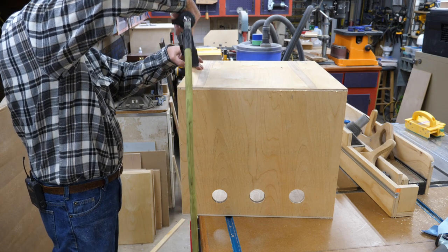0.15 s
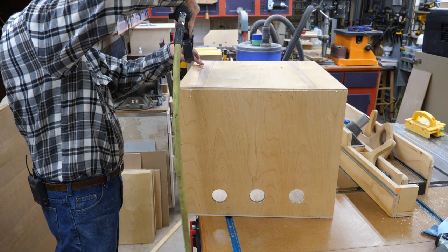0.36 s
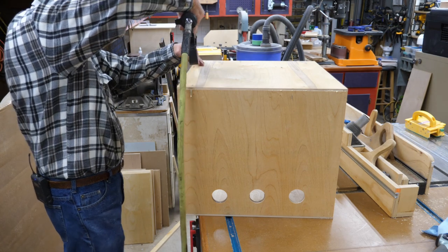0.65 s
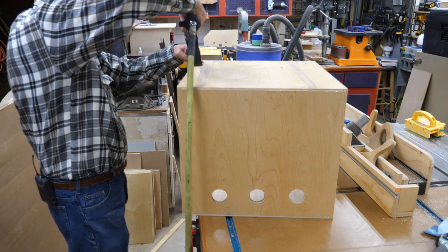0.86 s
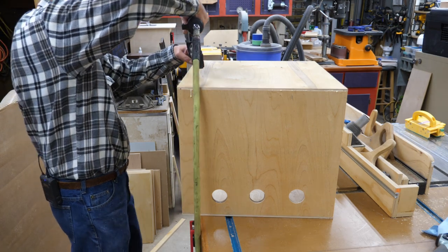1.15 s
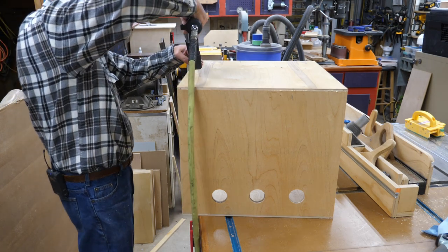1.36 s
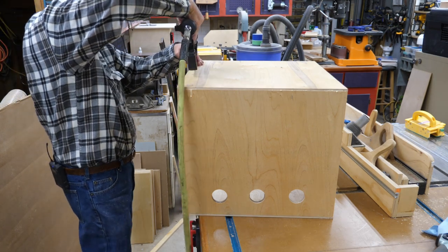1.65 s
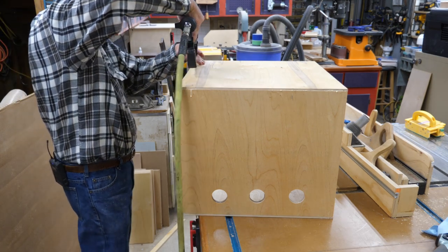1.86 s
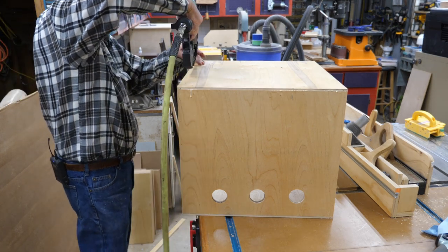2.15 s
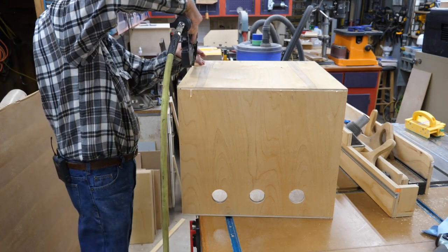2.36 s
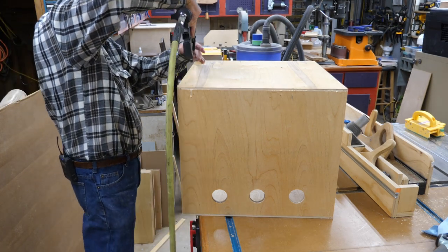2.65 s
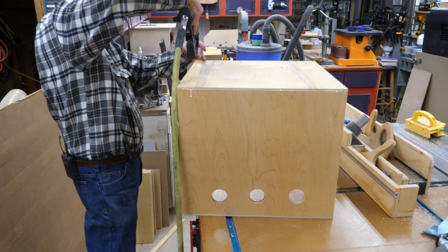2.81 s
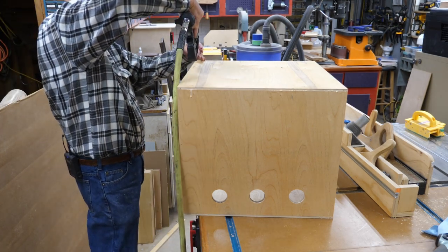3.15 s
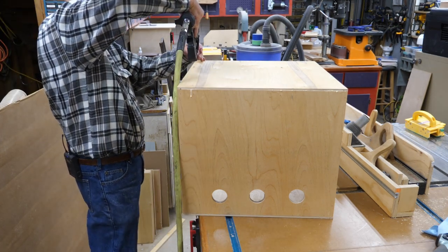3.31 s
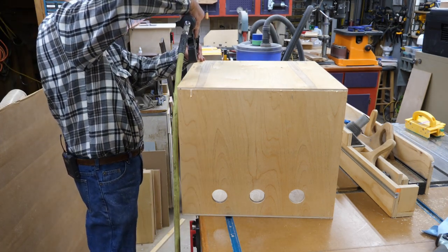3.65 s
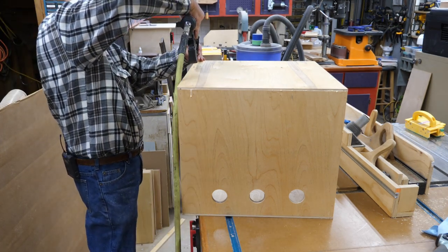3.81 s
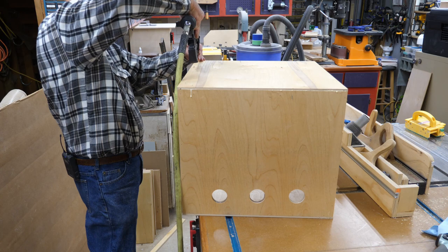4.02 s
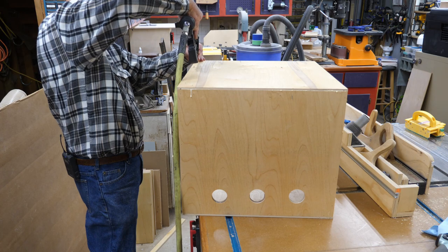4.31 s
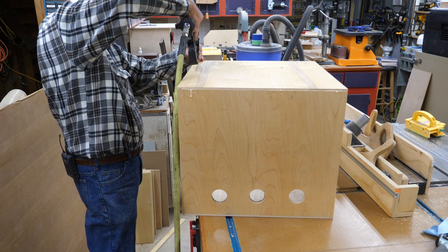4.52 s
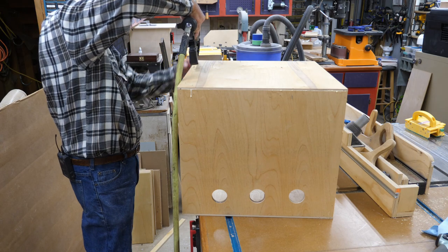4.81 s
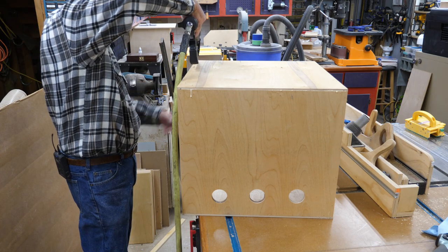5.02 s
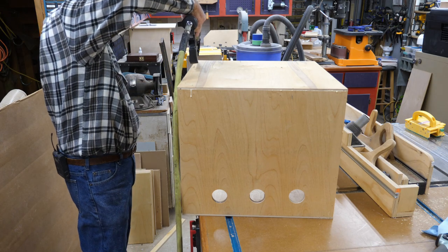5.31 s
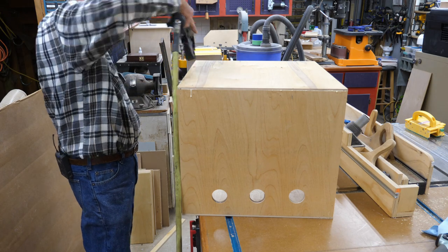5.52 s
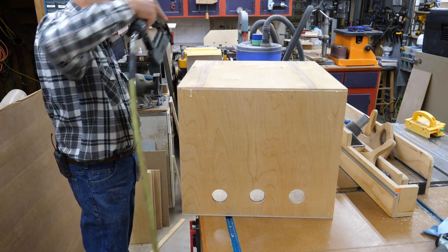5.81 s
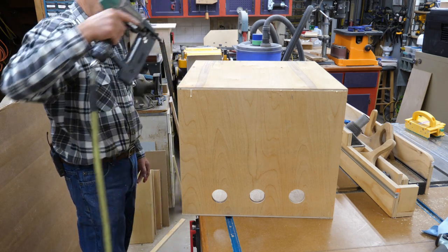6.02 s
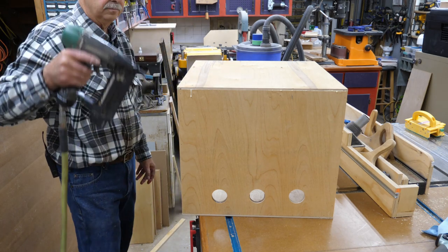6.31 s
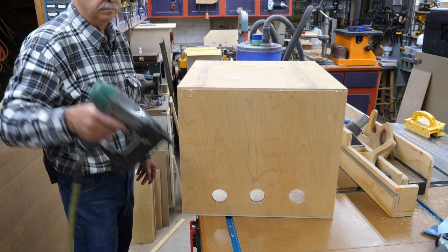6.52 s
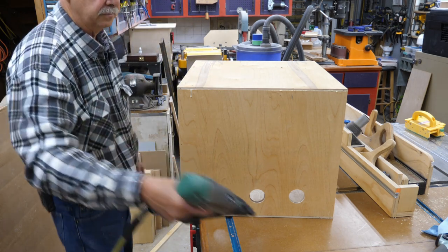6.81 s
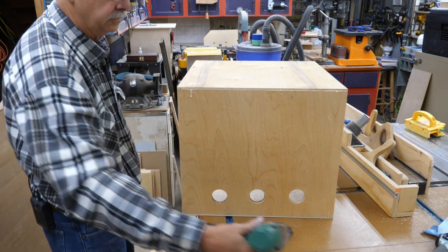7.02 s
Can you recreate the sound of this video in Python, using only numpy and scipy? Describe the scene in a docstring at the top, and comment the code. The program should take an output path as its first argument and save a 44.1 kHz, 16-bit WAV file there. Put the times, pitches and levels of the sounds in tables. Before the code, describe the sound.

In a woodshop, a pneumatic nailer slams three nails into a hollow plywood box, each blow followed by an air puff, with light taps between over fan hum.

```python
"""In a woodshop, a pneumatic nailer drives three nails into a plywood box; one microphone, no set distance.
The first cycle is already under way at the start. In each the trigger valve spits (noise and a ringing
sine), the driver slams (noise bursts), the box booms (decaying modes), air is dumped and the piston knocks.
Between shots the gun's nose slides and taps on the panel; after the last, hose and sleeve brush softly
(shaped noise). Behind: a fan's slowly rising rush with swelling tones, and faint noise bands fading late."""
import sys
import numpy as np
from scipy import signal
from scipy.fft import rfft, irfft, next_fast_len
from scipy.io import wavfile
from scipy.ndimage import uniform_filter1d, map_coordinates

SR = 44100
rng = np.random.default_rng(int(sys.argv[2]) if len(sys.argv) > 2 else 0)


def to_wav(sig):
    """Store sig (one row per channel, or 1-D mono) as 16-bit WAV at the path in sys.argv[1].

    Samples outside -1..1 are clipped; the rate is SR.
    """
    pcm = np.clip(np.atleast_2d(sig), -1, 1) * 32767
    pcm = np.round(pcm).astype(np.int16)
    wavfile.write(sys.argv[1], SR, pcm.T)  # frames by channels


N = 315747  # samples in the scene
AGE = np.arange(SR) / SR  # seconds since one sound began
CLOCK = np.arange(N) / SR  # seconds since the scene began


def amp(db):
    """Decibels to gain."""
    return 10 ** (np.asarray(db) / 20)


def unit(x):
    """Scale to rms 1."""
    return x / np.sqrt(np.mean(x ** 2) + 1e-20)


def along(points, hz):
    """Interpolate (Hz, value) points on a log frequency axis."""
    f, v = np.transpose(points)
    return np.interp(np.log(hz + 1), np.log(f + 1), v)


def wobble(rate):
    """A smooth random curve with rate knots a second."""
    knots = rng.standard_normal(int(N * rate / SR) + 4)
    return map_coordinates(knots, [CLOCK * rate])


def filtered(x, response):
    """Shape the spectrum of x by a gain that depends on frequency."""
    size = next_fast_len(len(x) + 8192)
    hz = np.fft.rfftfreq(size, 1 / SR)
    return irfft(rfft(x, size) * response(hz), size)[:len(x)]


def noise(spectrum, size=SR):
    """Coloured noise of rms 1."""
    white = rng.standard_normal(size)
    return unit(filtered(white, lambda hz: amp(along(spectrum, hz))))


def burst(spectrum, rise, hold, t60):
    """Noise that swells with time constant rise, holds, then falls 60 dB in t60 (all in seconds)."""
    swell = 1 - np.exp(-AGE / rise)
    decay = amp(-60 * np.maximum(AGE - hold, 0) / t60)
    return noise(spectrum) * swell * decay


def add(track, s, sound):
    """Mix a sound into the track at s seconds; whatever falls outside is cut off."""
    start = round(s * SR)
    part = sound[max(-start, 0):len(track) - start]
    track[max(start, 0):][:len(part)] += part


# The three nails at the box. Each row: blow in seconds, its level in dB, wait until the exhaust in
# seconds, exhaust level in dB, level in dB of the low thump within the exhaust.
NAILS = [(-.064, 2, 0.14, -.5, -33.5), (2.2459, 0, .137, 0.5, -27.5), (5.224, 1.24, 0.14, 0, -22.5)]


def nailer():
    """The firing cycle of each nail, from valve to blow to venting, and the last puff of the trigger."""
    out = np.zeros(N)
    for s, db, wait, exhaust_db, thump_db in NAILS:
        add(out, s - .052, trigger())
        add(out, s, amp(db) * drive())
        add(out, s + .105, head_valve_spit())
        add(out, s + wait - .008, head_valve_click())
        add(out, s + wait, amp(exhaust_db) * exhaust(thump_db))
    add(out, 5.44, trigger_release())
    return out


# Contacts of one blow. Each row: seconds after firing, level in dB, t60 in seconds.
BLOW_CONTACTS = [(0, -12, 0.077), (.003, -8, 0.03), (0.0101, -19, .04)]
# Colour of the crack. Each row: frequency in Hz, relative level in dB per Hz.
CRACK_COLOUR = [(88, -31), (150, -2.5), (439, 1), (716, -9), (1290, 6), (1630, -15), (2140, 0), (2400, -10),
                (2650, -1.5), (4410, -7), (5250, -6.5), (8730, -21), (13400, -26), (16000, -39)]


def drive():
    """The driver hits nail and bumper, the box booms, and the recoiling gun lands on it again."""
    crack = np.zeros(SR)
    for s, db, t60 in BLOW_CONTACTS:
        add(crack, s, amp(db) * burst(CRACK_COLOUR, rise=0.0013, hold=0.00072, t60=t60))
    boom = box(soft_hz=9000, swell_cycles=5.5)
    add(boom, -.006, amp(-23) * push(hz=143.4, width=0.00725))  # the top panel is shoved in
    add(boom, .028, amp(-16.0) * push(hz=408, width=0.00288))  # the gun lands again
    add(boom, .018, amp(-21.5) * push(hz=176.6, width=0.00793))  # and heaves under the landing
    return shop(crack, wet_db=-3.0) + boom


# Modes of the plywood box with the gun on it. Each row: frequency in Hz, relative level in dB,
# t60 in seconds.
BOX_MODES = [(138.8, -9.5, 0.17), (165.8, -16, 0.24), (218.7, -12, 0.23), (250, -27, 0.26),
             (365.3, -22, 0.18), (395.6, -20, 0.17), (483.7, -23, 0.35), (532.3, -17, 0.16),
             (585, -21.5, .18), (668, -26, 0.27), (726, -27, .1), (892, -25.5, .25), (958, -30.5, 0.27),
             (1070, -25, .26), (1190, -20, 0.13), (1348, -20.5, 0.18), (1595, -29.5, 0.16),
             (1697, -30, 0.33), (1860, -27, 0.19), (2055, -25.5, .27), (2536, -31, .16)]


def box(soft_hz, swell_cycles):
    """Box modes build over a few cycles and die away; a soft contact mostly stirs the low ones."""
    hz, db, t60 = np.transpose(BOX_MODES)[:, :, None]
    strength = amp(db + rng.normal(0, 1, hz.shape)) / (1 + (hz / soft_hz) ** 2)
    life = (1 - np.exp(-AGE * hz / swell_cycles)) * amp(-60 * AGE / t60)
    # each time the box is struck, its modes are detuned slightly at random
    pitch = hz * (1 + rng.normal(0, 0.0021, hz.shape))
    sign = (-1) ** np.arange(len(BOX_MODES))[:, None]  # neighbouring modes swing against each other
    return np.sum(sign * strength * life * np.sin(2 * np.pi * pitch * AGE), axis=0)


def push(hz, width):
    """One low shove of air: a sine under a bell of width seconds, centred two widths after its start."""
    t = AGE - 2 * width
    return np.sin(2 * np.pi * hz * t) * np.exp(-(t / width) ** 2)


# Colour of the dumped air. Each row: frequency in Hz, relative level in dB per Hz.
EXHAUST_COLOUR = [(160, -30.5), (280, -5), (367, -4), (1120, -5.5), (1280, -11), (1570, -4), (2100, -8),
                  (2800, -9), (3200, -10.5), (3860, -3.5), (5420, -6.5), (6410, -2.5), (8700, -12),
                  (14200, -9), (16000, -20.5)]
# Colour of the last air, also of the trigger's leak. Each row: frequency in Hz, relative level in dB per Hz.
BLEED_COLOUR = [(290, -34), (500, -28), (621, -25), (807, -37.5), (933, -22), (1020, -26.5), (1950, -6.5),
                (2570, -4.5), (6230, 1.5), (8450, -12), (13400, -19.5), (16000, -28)]
# Piston knocks on the way back. Each row: seconds after the exhaust opens, level in dB.
PISTON_KNOCKS = [(.001, -28), (.009, -19.5), (0.03, -29.5), (0.0396, -15.5)]
# Colour of a piston knock. Each row: frequency in Hz, relative level in dB per Hz.
PISTON_COLOUR = [(88, 0), (150, -10), (1900, -3), (2500, -17), (3040, -5.5), (5150, -15.5), (6020, -5.5),
                 (9080, -37.5), (13200, -40), (16000, -29)]


def exhaust(thump_db):
    """The cylinder dumps its air with a thump, the piston knocks back, and the last air bleeds off."""
    air = amp(-17.5) * burst(EXHAUST_COLOUR, rise=0.0035, hold=.018, t60=0.12)
    air += amp(-34.5) * burst(BLEED_COLOUR, rise=0.019, hold=0.086, t60=0.28)
    knocks = np.zeros(SR)
    for s, db in PISTON_KNOCKS:
        add(knocks, s, amp(db) * burst(PISTON_COLOUR, rise=0.00091, hold=0.0012, t60=0.035))
    body = np.zeros(SR)
    add(body, -.004, amp(thump_db) * push(hz=78.74, width=.0095))
    add(body, .006, amp(-11) * box(soft_hz=216, swell_cycles=0.97))
    add(body, .039, amp(-10) * box(soft_hz=119.7, swell_cycles=0.74))
    hard_stop_s = PISTON_KNOCKS[-1][0]
    add(body, hard_stop_s, amp(-24) * box(soft_hz=5000, swell_cycles=1.5))  # the piston's stop rings on
    return shop(air, wet_db=-15.5) + shop(knocks, wet_db=-12.5) + body


# Colour of the trigger valve's air. Each row: frequency in Hz, relative level in dB per Hz.
VALVE_COLOUR = [(180, -40), (300, -9.5), (701, -13), (885, -30), (1610, -10.5), (2440, -15), (3130, -12),
                (3640, -10.5), (4370, -5.5), (7080, -6.5), (8790, -18), (9880, -10), (13300, -12),
                (16000, -18.5)]


def trigger():
    """The trigger valve spits, and its steel parts ring briefly at an unsteady pitch."""
    spit = amp(-30) * burst(VALVE_COLOUR, rise=0.0014, hold=.008, t60=.12)
    ring = np.sin(2 * np.pi * 4300 * AGE + 2 * wobble(300)[:SR])
    steel = amp(-34.0) * ring * amp(-60 * AGE / .1)
    return shop(spit + steel, wet_db=-9.0)


# Colour of the head valve's spit. Each row: frequency in Hz, relative level in dB per Hz.
SPIT_COLOUR = [(1000, -31.5), (4000, -9.5), (9000, 3), (12000, -2.5), (16000, -2)]


def head_valve_spit():
    """A short spit of air from the head valve before it vents."""
    return shop(amp(-39.5) * burst(SPIT_COLOUR, rise=.001, hold=0.0057, t60=.012), wet_db=-11)


# Colour of small hard contacts. Each row: frequency in Hz, relative level in dB per Hz.
TICK_COLOUR = [(300, -8.5), (1500, -14.5), (3000, -3), (6000, 6), (8500, -9.5), (16000, -17.5)]


def head_valve_click():
    """The head valve clicks over: a tiny burst of hard-contact noise."""
    return amp(-34.0) * burst(TICK_COLOUR, rise=.0005, hold=0.0021, t60=0.0066)


def trigger_release():
    """The trigger is eased off: a thin leak of air stops short as its valve closes."""
    leak = amp(-45) * burst(BLEED_COLOUR, rise=.03, hold=.076, t60=.06)
    add(leak, .064, amp(-46) * burst(TICK_COLOUR, rise=.001, hold=.012, t60=.01))
    return leak


def click():
    """A small hard contact: a very short noise burst."""
    return burst(TICK_COLOUR, rise=.0002, hold=0.0008, t60=0.017)


# Colour of a wooden contact. Each row: frequency in Hz, relative level in dB per Hz.
KNOCK_COLOUR = [(100, -5.5), (300, -4), (520, 10.5), (1000, -4), (1700, -1.5), (3000, -8.5), (6000, -26),
                (16000, -87)]


def knock():
    """A short wooden contact: a noise burst weighted to the low mids."""
    return burst(KNOCK_COLOUR, rise=0.00053, hold=0.0017, t60=0.047)


def stroke(start, rise, length, db, t60):
    """Gain of a rubbing stroke: friction noise grows with hand speed, holds, and dies as the hand stops."""
    speed = np.clip((CLOCK - start) / rise, 0, 1)
    return speed * amp(db - 60 * np.maximum(CLOCK - start - length, 0) / t60)


# The nose slides over the plywood. Each row: start in seconds, speeding-up in seconds,
# length in seconds, level in dB.
NOSE_SLIDES = [(0.535, .2, 0.28, -50), (1.227, .004, 0.046, -44.5)]
# Colour of the sliding nose. Each row: frequency in Hz, relative level in dB per Hz.
SCRAPE_COLOUR = [(400, -15), (1200, -20), (1700, -5.5), (2350, -2.5), (3000, -9), (3800, -14.5),
                 (5000, -16.5), (7200, -24), (10500, -36), (15000, -39)]


def slides():
    """The nose rubs on plywood: scraping noise with a rough, random level."""
    gain = sum(stroke(*row, t60=0.21) for row in NOSE_SLIDES)
    return gain * noise(SCRAPE_COLOUR, size=N) * amp(wobble(120))


# Hose and sleeve brush as the gun is lifted and put down. Each row: start in seconds,
# speeding-up in seconds, length in seconds, level in dB.
HOSE_BRUSHES = [(6.0, 0.087, 0.12, -64.5), (6.74, 0.15, .16, -63), (7.0, .14, .16, -58)]
# Colour of the brushing. Each row: frequency in Hz, relative level in dB per Hz.
CLOTH_COLOUR = [(300, -6), (2000, 8), (5000, -1), (8500, -7), (11000, -20), (16000, -28)]


def brushes():
    """Soft rubbing of hose and sleeve after the last nail: smooth noise following each stroke."""
    gain = sum(stroke(*row, t60=0.4) for row in HOSE_BRUSHES)
    return gain * noise(CLOTH_COLOUR, size=N)


# The nose is set against the panel. Each row: time in seconds, level in dB, hardness of the contact 0-1.
NOSE_BUMPS = [(0.784, -43.5, 1), (0.809, -46.5, .95), (1.231, -42.5, 0.9), (1.332, -37, 0.24),
              (1.4, -42, 1), (1.5447, -38.5, 0.72), (1.6846, -24, .17), (1.695, -24.5, 0.2),
              (1.767, -31.5, .12), (4.0832, -39.5, 0.5), (4.586, -35, 0)]
# The steel safety tip clicks. Each row: time in seconds, level in dB.
TIP_CLICKS = [(1.143, -44), (1.3816, -52), (1.6497, -43), (1.7, -42), (4.5296, -43), (6.0693, -60)]


def handling():
    """Slides and brushes, with taps: hardness scales a bump's sharp contact but not the box's ring."""
    steel_in_bump_db, wood_in_click_db = -11.5, -7.5
    out = slides() + brushes()
    for s, db, hardness in NOSE_BUMPS:
        contact = np.clip(hardness, 0, 1) * (knock() + amp(steel_in_bump_db) * click())
        ring = box(soft_hz=301, swell_cycles=0.59)
        add(out, s, amp(db) * (shop(contact, wet_db=-7.5) + ring))
    for s, db in TIP_CLICKS:
        contact = click() + amp(wood_in_click_db) * knock()
        add(out, s, amp(db) * shop(contact, wet_db=-10.0))
    return out


# Colour of the fan's rush. Each row: frequency in Hz, relative level in dB per Hz.
RUSH_COLOUR = [(25, -21.5), (60, -11), (110, -7), (150, -11.5), (215, -5), (290, -9.5), (345, 0), (450, -6),
               (780, -2), (1350, -8), (2000, -14), (3200, -22.5), (5500, -26.5), (9000, -39.5),
               (16000, -48.5)]


def fan_rush():
    """Rushing air: coloured noise that creeps up by 0.43 dB a second."""
    return amp(-55.5 + 0.43 * CLOCK) * noise(RUSH_COLOUR, size=N)


# Fan tones. Each row: frequency in Hz, level in dB before the common swell.
FAN_TONES = [(113.0, -74.5), (344.5, -68.5), (732.1, -62), (753.7, -73), (786.0, -66.5), (899.0, -66),
             (1254, -73.5), (1292, -77), (1373, -73), (1830, -77.5), (1943, -80)]


def fan_tones():
    """Sines that waver a little in level and phase, and swell and sink slowly together."""
    swing_db, period_s, crest_s = 2.5, 5.3, 1.6
    tones = np.zeros(N)
    for hz, db in FAN_TONES:
        level = amp(db + 1.8 * wobble(2.4))
        tones += level * np.sin(2 * np.pi * hz * CLOCK + .5 * wobble(3))
    swell_db = 0.5 + swing_db * np.cos(2 * np.pi * (CLOCK - crest_s) / period_s)
    return amp(swell_db) * tones


def fan():
    """The fan behind the work: rushing air and wavering tones."""
    return fan_rush() + fan_tones()


# Faint noise bands at fixed frequencies. Each row: centre in Hz, width in Hz to half amplitude
# either side, level in dB before the common trim and fade.
NOISE_BANDS = [(4500, 710, -71.5), (7140, 680, -76.5), (11300, 970, -79), (13880, 700, -84)]


def faint_bands():
    """Faint bands of noise at fixed frequencies that hold until 4.3 s, then fade by 3.5 dB a second."""
    bands = np.zeros(N)
    for hz, width, db in NOISE_BANDS:
        white = rng.standard_normal(N)
        bands += amp(db) * unit(filtered(white, lambda f: 1 / (1 + ((f - hz) / width) ** 2)))
    return amp(-1.26 - 3.5 * np.maximum(CLOCK - 4.3, 0)) * bands


# Decay of the diffuse workshop. Each row: frequency in Hz, t60 in seconds.
SHOP_DECAY = [(150, 0.75), (600, 0.32), (2000, 0.44), (6000, 0.21), (14000, 0.21)]


def shop(x, wet_db):
    """A sound plus the diffuse workshop: each band stores its power and gives it back as fading noise."""
    hz, t, z = signal.stft(x, SR, nperseg=128)
    power = np.abs(uniform_filter1d(np.abs(z) ** 2, size=3, axis=0))
    # the fade acts on power, so 120 here is a 60 dB fall; the room builds over 11 ms
    fade = amp(-120 * t / along(SHOP_DECAY, hz)[:, None]) * (1 - np.exp(-t / 0.011))
    fade = fade / fade.sum(axis=1, keepdims=True)
    stored = np.abs(signal.fftconvolve(power, fade, axes=1))[:, :len(t)]
    grain = signal.stft(rng.standard_normal(SR), nperseg=128)[2]
    tail = signal.istft(grain / np.std(grain) * np.sqrt(stored), nperseg=128)[1][:SR]
    held = filtered(tail, lambda f: 1 - 1 / (1 + (f / 160) ** 4))  # deep bass is not held
    return x + amp(wet_db) * held


def scene():
    """Gun, handling, fan and faint noise bands at one microphone."""
    return (nailer() + handling() + fan() + faint_bands())[None]


def record(dry):
    """The highest peaks are rounded off, and almost nothing passes above the 15950 Hz band limit."""
    rounded = dry[0] / (1 + np.abs(dry[0] / .7) ** 4) ** (1 / 4)
    return filtered(rounded, lambda hz: 1 / np.sqrt(1 + (hz / 15950) ** 200))[None]


dry = scene()
out = record(dry)
to_wav(out)
```